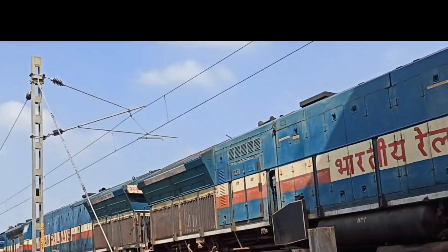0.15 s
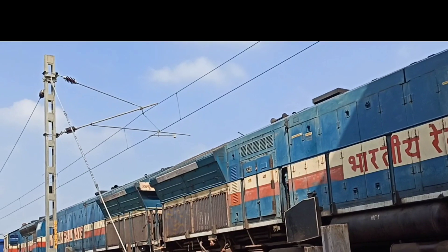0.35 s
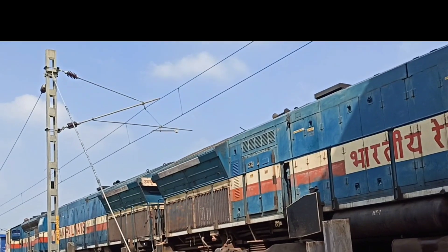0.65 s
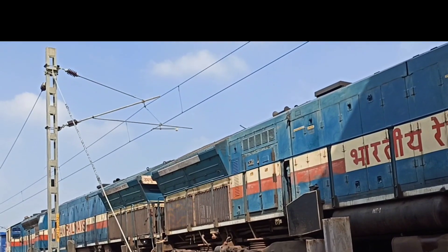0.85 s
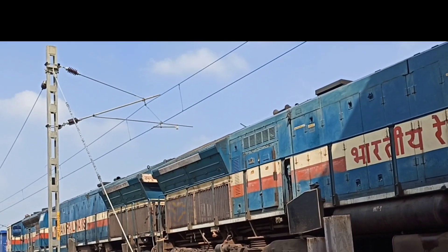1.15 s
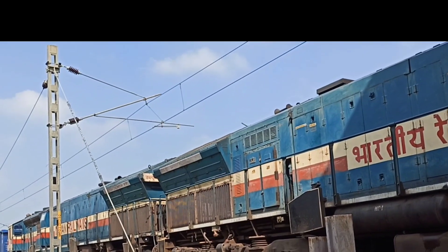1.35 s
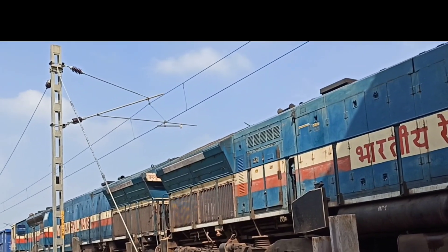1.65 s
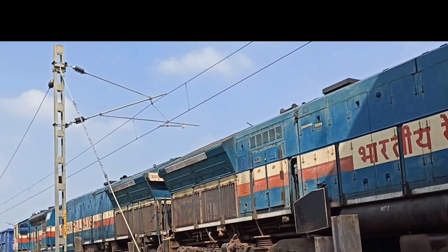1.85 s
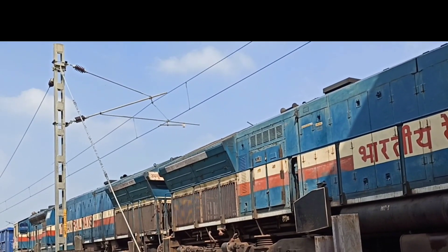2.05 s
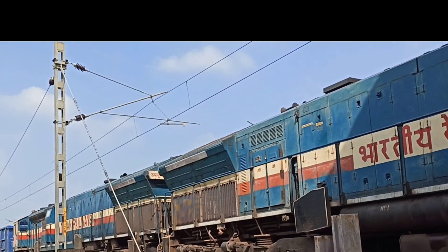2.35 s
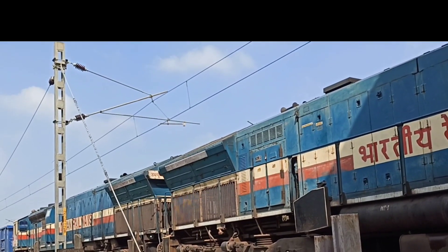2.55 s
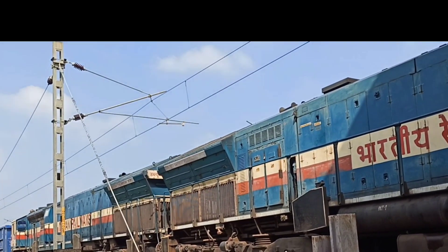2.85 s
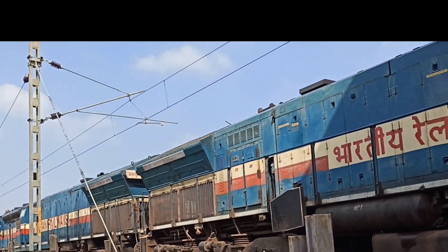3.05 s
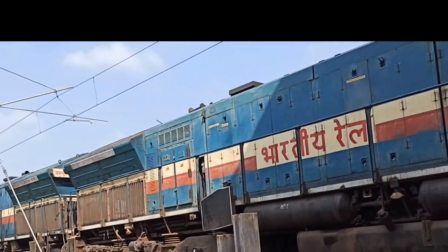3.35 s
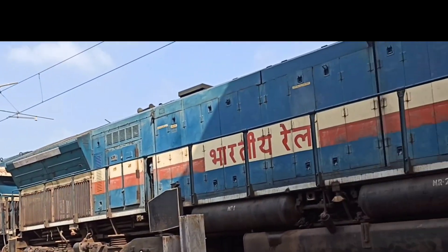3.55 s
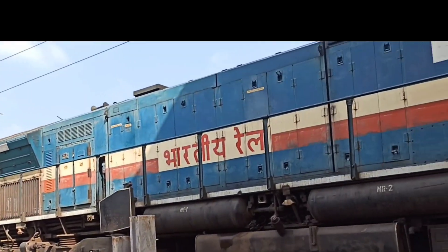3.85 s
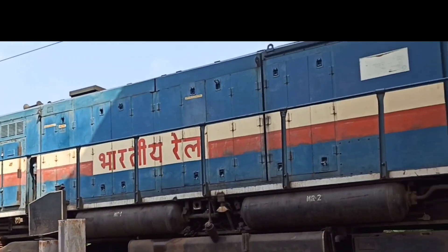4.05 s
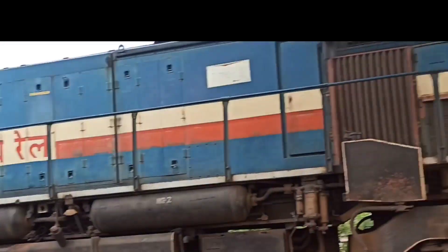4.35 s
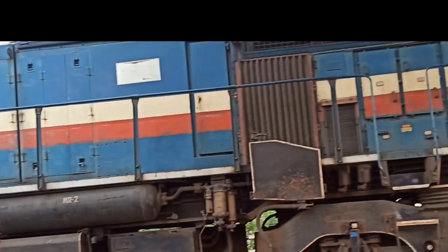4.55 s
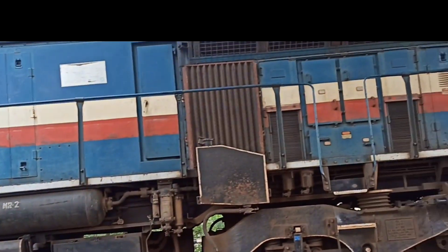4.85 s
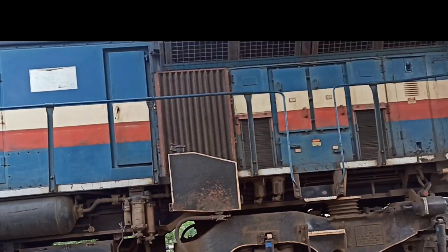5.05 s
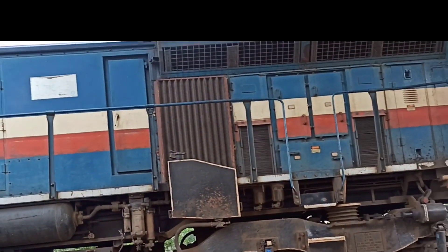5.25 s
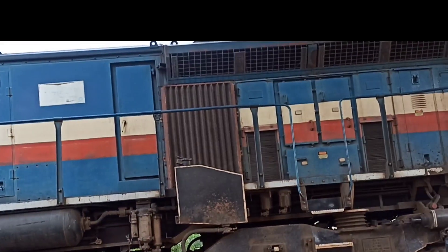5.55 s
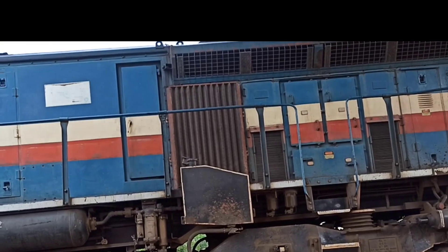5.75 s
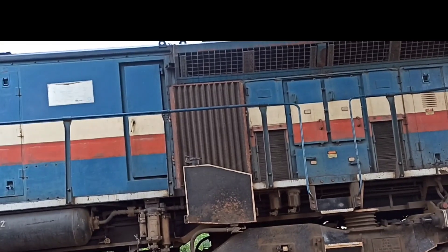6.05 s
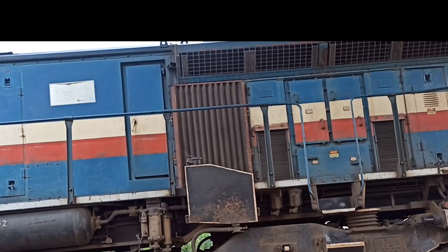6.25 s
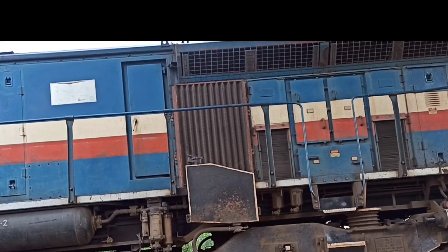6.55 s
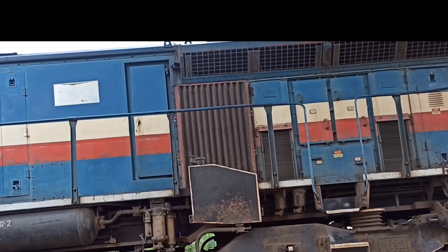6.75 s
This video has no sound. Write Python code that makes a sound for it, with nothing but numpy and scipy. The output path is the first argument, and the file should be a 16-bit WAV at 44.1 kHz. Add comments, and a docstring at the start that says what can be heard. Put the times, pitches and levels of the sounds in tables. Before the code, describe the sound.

A diesel locomotive passes slowly and close, its deep throbbing engine and steady high whine broken once by a loud burst of air.

```python
"""Diesel locomotive passing slowly

A sixteen-cylinder two-stroke turns steadily, a few metres away. Unequal firings throb in the exhaust,
the hood drones and rattles, and turbocharger and gears whine over a low roar and the cooling air.
An air valve blows off once, loudly, ducking the engine; faint puffs and ticks come before and after."""
import sys
import numpy as np
from scipy import signal
from scipy.fft import rfft, irfft
from scipy.io import wavfile
from scipy.ndimage import uniform_filter1d

SR = 44100
rng = np.random.default_rng(int(sys.argv[2]) if len(sys.argv) > 2 else 0)


def log_audio(samples):
    """Write samples as a 16-bit WAV file to the path given in sys.argv[1]."""
    # one column per channel
    frames = np.atleast_2d(samples).T
    # limit to full scale, then quantise
    limited = np.clip(frames, -1, 1)
    pcm = np.round(limited * 32767).astype(np.int16)
    wavfile.write(sys.argv[1], SR, pcm)


N = 303496
T = np.arange(N) / SR
HZ = np.fft.rfftfreq(N, 1 / SR)
CRANK_HZ = 4.507

# Cylinder strengths in firing order (level [dB])
FIRINGS_DB = [5, 4, 9, 7, 7, 1, 7, -15, 3, -15, -15, 2, 5, 2, 1, 9]
# Exhaust resonances in series (frequency [Hz], half width [Hz])
EXHAUST_MODES = [(84, 5), (103.5, 5), (88, 50), (88, 50)]
# Exhaust colour from ground and hood echoes (frequency [Hz], gain [dB])
ECHO_EQ = [(63, 0.5), (68, -15), (72, -1.5), (76.6, 6), (81, 5), (86, 13.5), (92, 4)]
# Hood drone (crank order, level [dB])
DRONE_ORDERS = [(12, -44.5), (30, -40), (33, -43), (40, -34.5), (43, -35.5), (49, -32.5), (52, -41),
                (58, -36.5), (60, -36.5), (79, -34.5), (80, -37.5), (88, -46), (90, -31.5), (92, -39),
                (94, -34), (96, -31.5), (112, -40.5), (113, -33.5), (127, -43), (146, -35), (147, -35),
                (156, -42), (158, -32.5), (159, -41)]
# Hood rattle (frequency [Hz], gain [dB])
RATTLE_SPECTRUM = [(60, -26), (115, -13), (135, -13), (230, -9), (305, -4.5), (420, -6.5), (490, -2.5),
                   (550, -13), (700, 2.5), (800, -10), (1100, -18), (2000, -42), (4000, -48)]
# Engine roar (frequency [Hz], gain [dB])
ROAR_SPECTRUM = [(20, -23), (48, -22), (70, 1), (130, 1), (240, 1), (305, -1.5), (350, 0.5), (430, 0),
                 (580, -2.5), (720, -3), (830, -9.5), (1100, -25), (2000, -31.5), (5000, -73)]
# Side grille air (frequency [Hz], gain [dB])
GRILLE_SPECTRUM = [(300, -20), (640, -18), (725, 3.5), (800, 2.5), (900, 2.5), (1000, 5), (1120, -2.5),
                   (1500, -1.5), (1850, -18), (2130, 0.5), (2300, -22.5), (4000, -30), (8000, -66)]
# Fan hiss (frequency [Hz], gain [dB])
FAN_SPECTRUM = [(500, -24.5), (1200, 0.5), (1700, 1.5), (2050, 2), (2400, -1), (3200, -6), (3800, -2),
                (4400, -5), (5200, -7), (6700, -5), (6950, -8), (7580, -6), (7780, -8), (8400, -12.5),
                (12000, -23.5), (15700, -28.5)]
# Turbo blade tone as the body passes (time [s], level [dB])
BLADE_LEVEL = [(0, -22.5), (1.9, -23.6), (3.8, -26), (5.1, -24.5), (6.88, -23.5)]
# Blade tone partials (harmonic, gain [dB], roughness [0-1])
BLADE_PARTIALS = [(1, 1, 0.1), (2, -19.5, 0.4), (3, -32.5, .7)]
# Gear tones (frequency [Hz], swing [Hz], throb [dB], load peak [turns], roughness [0-1],
# coming [dB], abreast [dB], going [dB])
GEAR_TONES = [(1006, 3.8, -0.5, 0.55, 0.7, -56, -40, -53), (2169, 10, 1.5, .85, 0.63, -37, -37, -40),
              (2559.4, 9.4, 4, 0.5, 0.1, -31, -31, -37.5), (4323, 8, 6.5, 0.87, 0.5, -43, -38, -41.5),
              (5435, 5, 4, 1, .3, -50, -49, -50), (5860, 6, 4.5, 0.66, .3, -49, -53, -47)]
# Air puffs (start [s], level [dB], rise [s], decay [s])
AIR_PUFFS = [(1.98, -29, .02, 0.033), (2.205, -27, .015, 0.043), (5.72, -34.5, 0.09, .2),
             (6.535, -25, .025, 0.15)]
# Air jet (frequency [Hz], gain [dB])
JET_SPECTRUM = [(700, -20), (2000, -3), (3300, 3), (4400, 2), (5500, 0), (7300, 2.5), (8400, -7),
                (12000, -18), (15700, -25)]
# High ticks (start [s], level [dB], frequency [Hz], half width [Hz], decay [s])
HIGH_TICKS = [(2.303, -39, 15400, 250, .006), (2.36, -47, 15400, 250, .005),
              (3.517, -35, 13800, 1510, .002)]
# Valve spurts (start [s], level [dB], rise [s], hold [s], decay [s], treble tilt [dB/octave])
VALVE_SPURTS = [(2.635, -20, 0.011, 0.026, .03, 1), (2.678, -12.5, .012, .01, 0.052, 2),
                (2.743, -8.5, 0.03, 0.031, 0.075, 1)]
# Vent pipe rush (frequency [Hz], gain [dB])
VENT_SPECTRUM = [(500, -10), (800, 2), (1200, -11), (1800, 5.5), (2400, 0), (3300, -0.5), (4500, -3.5),
                 (6500, -10), (9000, -30), (15000, -51)]
# Vent pipe resonances (frequency [Hz], half width [Hz], gain [dB])
HOWL_MODES = [(797, 11, 3), (986, 9.4, 0.5), (1020, 8, -5), (1160, 14, -4.5), (1357, 10, -8.5),
              (1775, 39, -7)]
# Treble gaps dulling the whole sound: dip at 5-6 kHz, hole at 8.6-11.5 kHz (frequency [Hz], gain [dB])
TREBLE_GAPS = [(4680, -1), (4820, -8.5), (6040, -9.5), (6150, -2), (8400, -1), (8650, -15), (10000, -22),
               (11000, -31), (11450, -27), (11700, -0.5)]


def amp(db):
    """Decibels to gain."""
    return 10 ** (np.asarray(db) / 20)


def unit(x):
    """Scale to rms 1."""
    return x / np.sqrt(np.mean(abs(x) ** 2) + 1e-20)


def curve(points):
    """(time, value) points joined by straight lines."""
    return np.interp(T, *np.transpose(points))


def shape(spectrum, hz=HZ):
    """Gain of a spectrum at hz."""
    points_hz, db = np.transpose(spectrum)
    return amp(np.interp(np.log(hz + 1), np.log(points_hz + 1), db))


def noise(gains):
    """Spectrally shaped noise, rms 1."""
    return unit(irfft(rfft(rng.standard_normal(N)) * gains, N))


def flutter(width_hz):
    """Complex low-pass noise, rms 1."""
    gains = 1 / (1 + (HZ / width_hz) ** 2)
    return unit(noise(gains) + 1j * noise(gains))


def wavering(share, width_hz):
    """Complex tone amplitude with a share of its power fluttering."""
    return np.sqrt(1 - share) + np.sqrt(share) * flutter(width_hz)


def envelope(start_s, rise_s, hold_s, decay_s):
    """Linear rise, hold, exponential decay."""
    age_s = T - start_s
    return np.clip(age_s / rise_s, 0, 1) * np.exp(-np.maximum(age_s - rise_s - hold_s, 0) / decay_s)


def each_turn(orders, amplitudes, size=16384):
    """Sum of crank orders, repeated every turn."""
    spectrum = np.zeros(size // 2 + 1, complex)
    spectrum[orders] = amplitudes
    one_turn = irfft(spectrum) * size / 2
    return np.interp(T * CRANK_HZ, np.arange(size) / size, one_turn, period=1)


def crank_swing(peak_turns):
    """One cosine cycle per crank turn."""
    return np.cos(2 * np.pi * (T * CRANK_HZ - peak_turns))


def grille_db(far_db=-37, near_db=-28.5, midpoint_s=3.65, change_s=1.7):
    """Side grille level, rising as the grilles come abreast."""
    nearness = 0.5 + 0.5 * np.tanh(2 * (T - midpoint_s) / change_s)
    return far_db + nearness * (near_db - far_db)


def exhaust(level_db=-20, first_firing_s=0.1681, unsteady=0.077):
    """Sixteen evenly spaced, unequal firings ring the pipe: the same throb every turn."""
    orders = np.arange(8, 40)
    hz = orders * CRANK_HZ
    fired_s = first_firing_s + np.arange(len(FIRINGS_DB)) / len(FIRINGS_DB) / CRANK_HZ
    firings = np.exp(-2j * np.pi * np.outer(hz, fired_s)) @ amp(FIRINGS_DB)
    modes = [1 / (1 + 1j * (hz - mode_hz) / width_hz) for mode_hz, width_hz in EXHAUST_MODES]
    throb = unit(each_turn(orders, firings * np.prod(modes, axis=0) * shape(ECHO_EQ, hz)))
    return amp(level_db) * throb * (1 + unsteady * flutter(7.6).real)


def hood_drone(unsteady=0.29, beam_share=0.47, beam_above_hz=620, abreast_db=-29.5):
    """Panels sing at strong, wavering crank orders; the high ones beam out through the grilles."""
    beam_db = beam_share * (grille_db() - abreast_db)
    knots_s = np.linspace(0, T[-1], 15)
    out = 0
    for order, db in DRONE_ORDERS:
        hz = order * CRANK_HZ
        swell = unsteady * np.interp(T, knots_s, rng.standard_normal(len(knots_s)))
        drift_rad = unsteady * np.interp(T, knots_s, rng.standard_normal(len(knots_s)))
        gain = np.sqrt(2) * amp(db + beam_db * (hz > beam_above_hz)) * (1 + swell)
        out += gain * np.cos(2 * np.pi * (hz * T + rng.random()) + drift_rad)
    return out


def hood_rattle(level_db=-27.5):
    """Panels shake alike every turn: dense, weak crank orders."""
    orders = np.arange(25, 700)
    phasors = np.exp(2j * np.pi * rng.random(len(orders)))
    return amp(level_db) * unit(each_turn(orders, shape(RATTLE_SPECTRUM, orders * CRANK_HZ) * phasors))


def engine_roar(level_db=-19.5):
    """Steady low engine noise."""
    return amp(level_db) * noise(shape(ROAR_SPECTRUM))


def cooling_air(fan_db=-28.5, flicker_db=0.75, flicker_hz=9.3):
    """Fans hiss with a faint flicker; air rushes through the side grilles."""
    fans = amp(fan_db + flicker_db * flutter(flicker_hz).real) * noise(shape(FAN_SPECTRUM))
    return fans + amp(grille_db()) * noise(shape(GRILLE_SPECTRUM))


def turbo(blade_hz=3987, swing_hz=6, throb_db=1, jitter_hz=5, fade_share=0.41):
    """The blade tone swings with the crank; turbulence fades and roughens it."""
    surge = crank_swing(peak_turns=0.12)
    pitch_hz = blade_hz + swing_hz * surge + jitter_hz * unit(flutter(width_hz=22).real)
    cycles = np.cumsum(pitch_hz) / SR
    tone = 0
    for harmonic, db, roughness in BLADE_PARTIALS:
        turbulence = wavering(fade_share, width_hz=20) * wavering(roughness, width_hz=55)
        tone += amp(db) * (turbulence * np.exp(2j * np.pi * harmonic * cycles)).real
    return np.sqrt(2) * amp(curve(BLADE_LEVEL) + throb_db * surge) * tone


def gears(uneven_db=1):
    """Teeth take up and shed load once a turn; each tone's level shifts as its housing passes. The lowest tone,
    near 1 kHz, swells with the blast and lingers."""
    out = 0
    for hz, swing_hz, throb_db, peak_turns, roughness, coming_db, abreast_db, going_db in GEAR_TONES:
        pass_db = curve([(2.2, coming_db), (3.2, abreast_db), (4.8, abreast_db), (5.25, going_db)])
        load = np.tanh(2.2 * (crank_swing(peak_turns) + 0.2))  # on for just over half a turn
        swell_db = throb_db * load + uneven_db * unit(flutter(width_hz=1.4).real)
        cycles = np.cumsum(hz + swing_hz * crank_swing(peak_turns=0.97)) / SR
        tone = (wavering(roughness, width_hz=28) * np.exp(2j * np.pi * cycles)).real
        out += np.sqrt(2) * amp(pass_db + swell_db) * tone
    return out


def air_puffs(low_cut_hz=5000, pipe_hz=1075, ripple_db=4.5):
    """Thin jets of air, coloured by a short pipe's overtones."""
    gain = sum(amp(db) * envelope(start_s, rise_s, 0, decay_s)
               for start_s, db, rise_s, decay_s in AIR_PUFFS)
    pipe = amp(ripple_db * np.cos(2 * np.pi * HZ / pipe_hz))
    low_cut = HZ ** 2 / (HZ ** 2 + low_cut_hz ** 2)
    return gain * noise(shape(JET_SPECTRUM) * pipe * low_cut)


def ticks():
    """Tiny bursts of high noise."""
    out = 0
    for start_s, db, hz, width_hz, decay_s in HIGH_TICKS:
        burst = (T >= start_s) * np.exp(-abs(T - start_s) / decay_s)
        band = np.exp(-((HZ - hz) / width_hz) ** 2)
        out += amp(db) * burst * noise(band)
    return out


def air_valve(open_s=2.716, rise_s=0.028, hold_s=0.099, rush_db=-14, howl_db=-17):
    """Three bright spurts; the vent pipe rushes, and its resonances howl on as the pressure falls."""
    octaves = np.log2(1 + HZ / 1000)
    jet = 0
    for start_s, db, *stages_s, tilt_db in VALVE_SPURTS:
        hiss = noise(shape(JET_SPECTRUM) * amp(tilt_db * octaves))
        jet += amp(db) * envelope(start_s, *stages_s) * hiss
    rush = amp(rush_db) * envelope(open_s, rise_s, hold_s, decay_s=0.13) * noise(shape(VENT_SPECTRUM))
    modes = sum(amp(db) / (1 + ((HZ - hz) / width_hz) ** 2) for hz, width_hz, db in HOWL_MODES)
    howl = amp(howl_db) * envelope(open_s, rise_s, hold_s, decay_s=0.16) * noise(modes)
    return jet + rush + howl


def gain_control(x, threshold_db=-16, cut_share=0.87, window_s=0.048, recovery_db_per_s=130,
                 low_cut_hz=587):
    """Duck everything when mids and treble exceed the threshold: the engine sinks under the blast."""
    sidechain = signal.sosfilt(signal.butter(2, low_cut_hz, "high", fs=SR, output="sos"), x[0])
    power = abs(uniform_filter1d(sidechain ** 2, round(window_s * SR)))
    power_db = 10 * np.log10(power + 1e-12)
    fall_db = T * recovery_db_per_s
    held_db = np.maximum.accumulate(power_db + fall_db) - fall_db
    excess_db = np.maximum(held_db - threshold_db, 0)
    return x * amp(-cut_share * uniform_filter1d(excess_db, size=200))


def scene():
    """Engine, cooling air and whines, with the air valve on top; mono."""
    engine = exhaust() + hood_drone() + hood_rattle() + engine_roar()
    return (engine + cooling_air() + turbo() + gears() + air_valve() + air_puffs() + ticks())[None]


def record(dry):
    """Gain control, soft ends, treble gaps, band limit."""
    ducked = gain_control(dry) * signal.windows.tukey(N, 0.001)
    dulled = irfft(rfft(ducked) * shape(TREBLE_GAPS), N)
    low_pass = signal.firwin(511, cutoff=15750, window=("kaiser", 9), fs=SR)
    return signal.oaconvolve(dulled, low_pass[None], "same")


dry = scene()
out = record(dry)
log_audio(out)
```